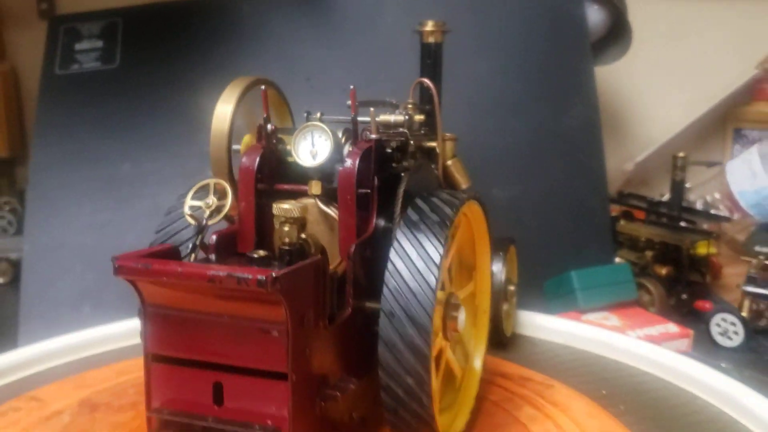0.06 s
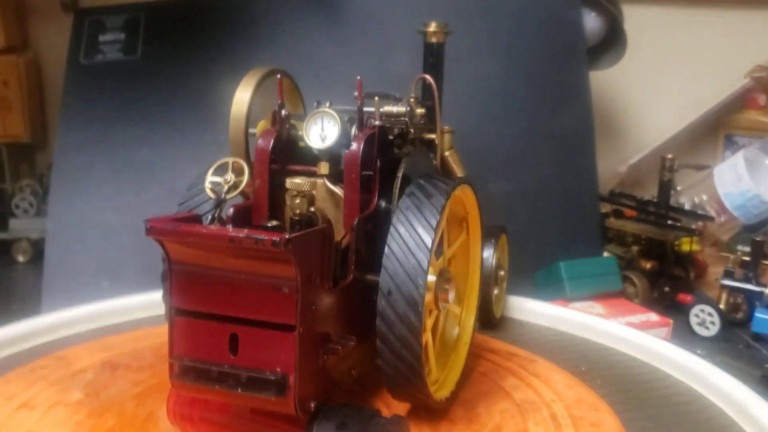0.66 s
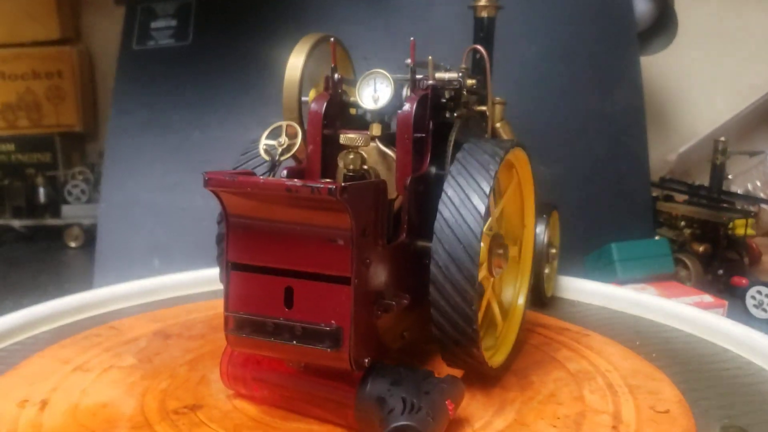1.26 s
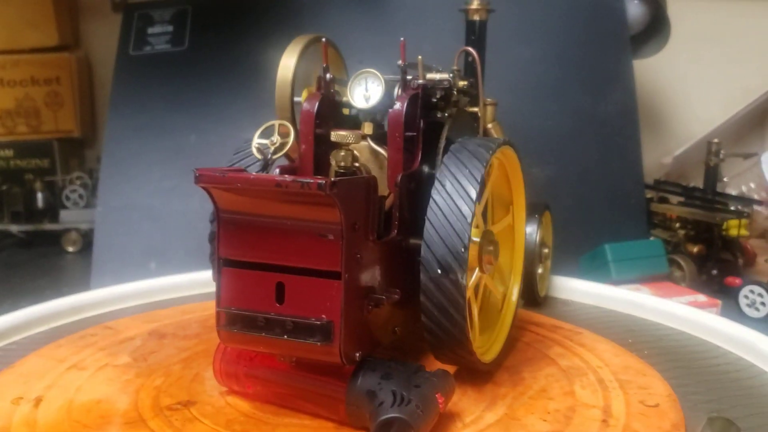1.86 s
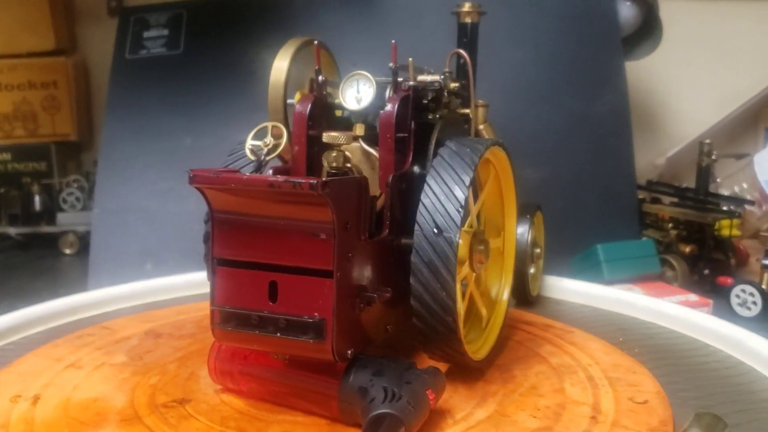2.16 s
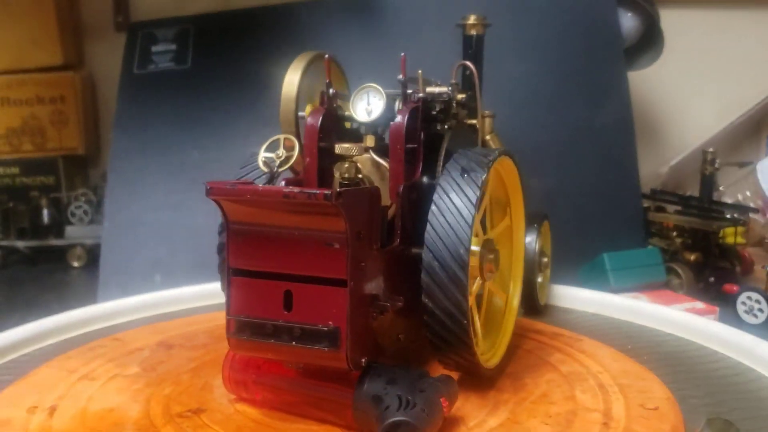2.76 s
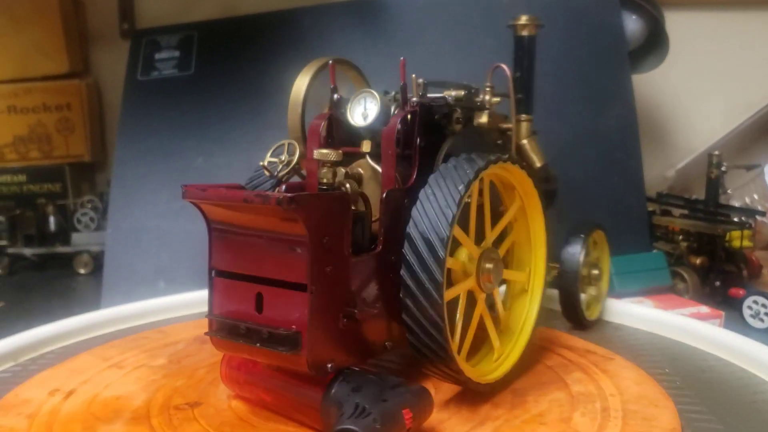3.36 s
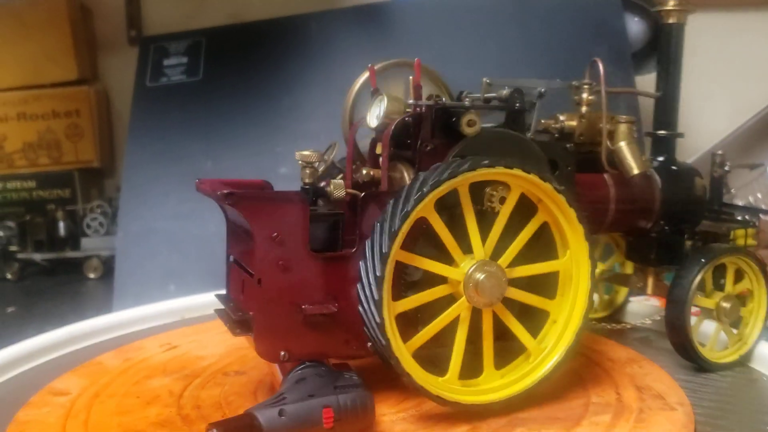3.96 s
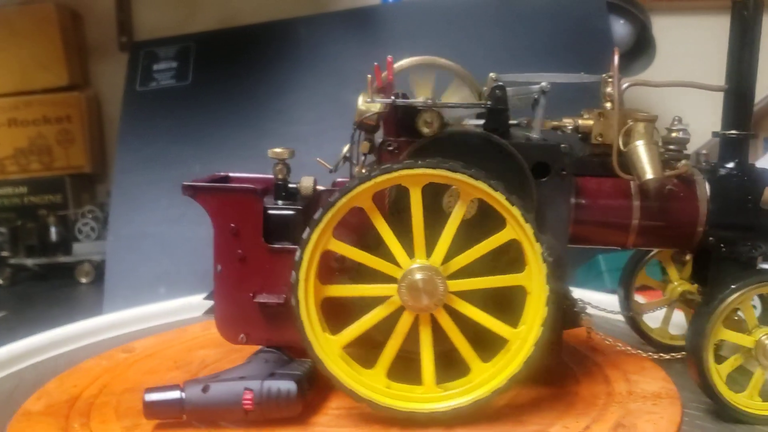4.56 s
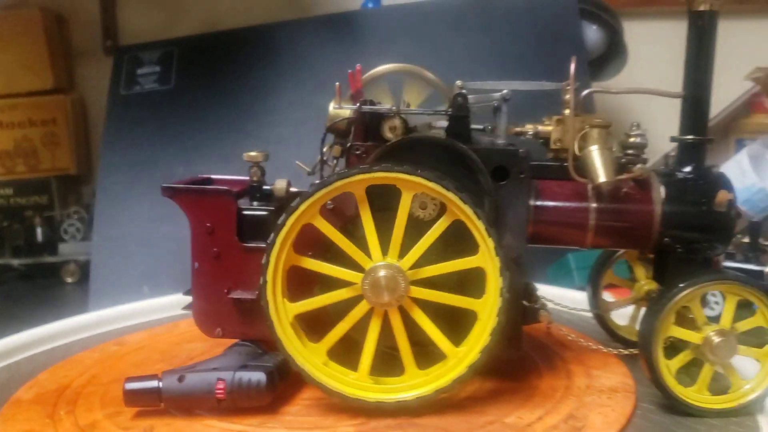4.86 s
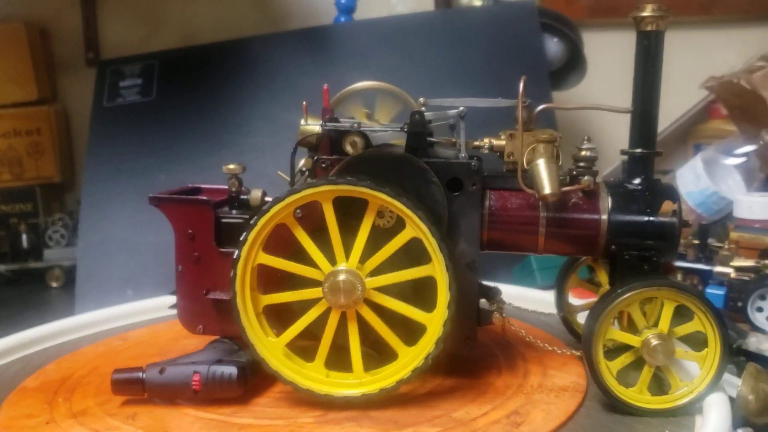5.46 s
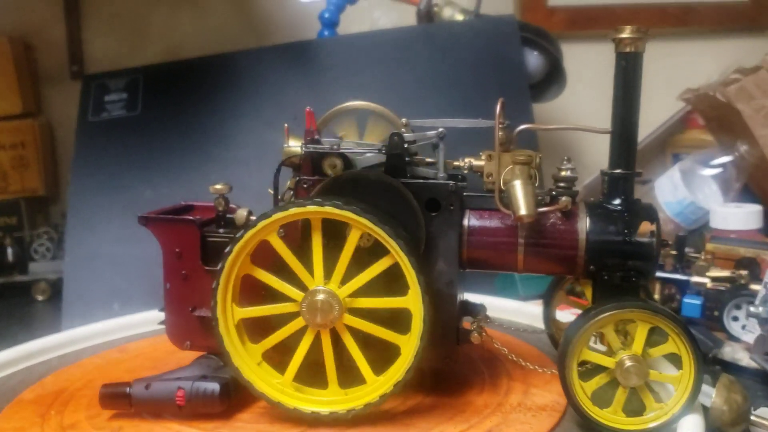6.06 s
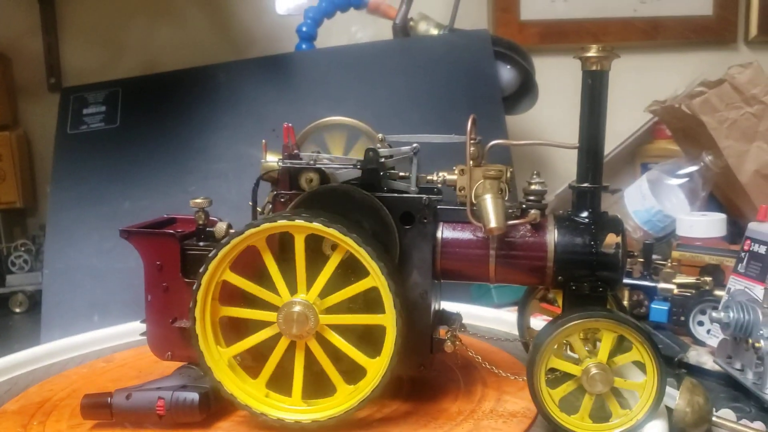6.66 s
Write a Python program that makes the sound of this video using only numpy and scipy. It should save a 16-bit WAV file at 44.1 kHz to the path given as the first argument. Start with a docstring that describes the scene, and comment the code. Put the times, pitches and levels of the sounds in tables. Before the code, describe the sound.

A small model steam engine runs quietly in a workshop, its rods tapping in a quick, even rhythm under a steady hiss, with faint chuffs and tiny spits of water. Early on, fingers rub, click sharply and thump right at the microphone. About halfway through, the turntable beneath the engine is pushed round with a grinding rumble, followed by light gear clanks and rattles as the engine keeps running.

```python
"""Model traction engine on a turntable

A model steam engine ticks over in a workshop, about six and a half turns a second. Rods and valve gear
knock in a fixed order on every turn; steam leaks steadily, chuffs twice a turn and spits drops of water.
Loose parts rattle, slack gears clank, and the table is pushed round on its rumbling bearing.
Close up, fingers rub, click and thump on a hand-held camera, and the palm cups one microphone."""
import sys
import numpy as np
from scipy import signal
from scipy.fft import rfft, irfft, next_fast_len
from scipy.io import wavfile

SR = 44100
rng = np.random.default_rng(int(sys.argv[2]) if len(sys.argv) > 2 else 0)


def transcribe(u):
    """Save the signal u as a 16-bit wav file named by the first command-line argument.

    u: samples, shape (n,) or (channels, n), limited to [-1, 1]; the rate is SR.
    q: integer samples, one column per channel.
    """
    v = np.clip(np.atleast_2d(u).T, -1, 1)
    q = np.round(v * 32767).astype(np.int16)
    wavfile.write(sys.argv[1], SR, q)


N = 296352
TIME = np.arange(N) / SR


def from_db(db):
    """Decibels to gain."""
    return 10 ** (np.asarray(db) / 20)


def rms_one(x):
    """Scale to rms 1."""
    return x / np.sqrt(np.mean(x ** 2) + 1e-20)


def in_time(rows):
    """Each column of an automation curve at every sample."""
    s, *columns = np.transpose(rows)
    return [np.interp(TIME, s, c) for c in columns]


def panned(pan_db):
    """Stereo gains for a pan, given throughout as left minus right in dB."""
    return from_db(np.array([[.5], [-.5]]) * pan_db)


def add(out, s, sound):
    """Mix a stereo sound in at s seconds."""
    start = int(np.clip(round(s * SR), 0, N - 1))
    out[:, start:start + sound.shape[1]] += sound[:, :N - start]


def drift(knots_per_s):
    """A random wander, gliding between values of spread 1."""
    knots = rng.standard_normal(1400)
    return np.interp(TIME * knots_per_s, np.arange(len(knots)), knots)


def stereo_noise(likeness, size=N):
    """White noise; likeness is the share of power common to left and right."""
    shared, own = rng.standard_normal(size), rng.standard_normal((2, size))
    return np.sqrt(likeness) * shared + np.sqrt(1 - likeness) * own


def coloured(x, spectrum):
    """Equalise with a curve that falls steeply beyond its ends; rms 1."""
    hz, db = np.transpose(spectrum)
    size = next_fast_len(N)
    log_hz = np.log(np.arange(size // 2 + 1) * SR / size + 1)
    outside = np.maximum(np.log(hz[0]) - log_hz, 0) + np.maximum(log_hz - np.log(hz[-1]), 0)
    gain = from_db(np.interp(log_hz, np.log(hz), db) - 45 * outside)
    return rms_one(irfft(rfft(x, size) * gain, size)[..., :N])


def decaying(kicks, decay_s):
    """Give every kick an exponential tail."""
    return signal.lfilter([1], [1, -np.exp(-1 / (decay_s * SR))], kicks + 1e-18)


def resonate(x, hz, width_hz):
    """One resonance with gain 1 at its peak."""
    r = np.exp(-np.pi * width_hz / SR)
    feedback = [1, -2 * r * np.cos(2 * np.pi * hz / SR), r * r]
    return signal.lfilter(np.array([1, 0, -1]) * (1 - r * r) / 2, feedback, x + 1e-18)


def body(force, modes):
    """Steep-skirted modes in parallel, alternating in polarity, each with its own pan; rms 1."""
    out = 0
    for k, (hz, width, db, pan) in enumerate(modes):
        mode = rms_one(resonate(resonate(force, hz, width), hz, 4 * width))
        out = out + (-1) ** k * from_db(db) * panned(pan) * mode
    return rms_one(out)


# The flywheel's tempo. Each row: time in seconds, turns per second.
FLYWHEEL_SPEED = [(0, 6.323), (1.9, 6.698), (2.7, 6.694), (3.6, 6.588), (4.3, 6.433), (5.0, 6.38),
                  (6.2, 6.441), (6.72, 6.35)]
START_TURNS = .057


def each_turn(positions, levels_db, decay_s, scatter_db, jitter_s):
    """An envelope that jumps at given crank positions on every turn and dies away."""
    turns = START_TURNS + np.cumsum(in_time(FLYWHEEL_SPEED)[0]) / SR
    due = np.arange(int(turns[-1]) + 1)[:, None] + np.array(positions)
    when = np.interp(due, turns, TIME, left=-1, right=-1) + jitter_s * rng.standard_normal(due.shape)
    height = from_db(np.array(levels_db) + scatter_db * rng.standard_normal(due.shape))
    heard = (when > 0) & (when < TIME[-1])
    kicks = np.bincount((when[heard] * SR).astype(int), height[heard], N)
    return decaying(kicks, decay_s)


# Where the hisses sit as the camera moves. Each row: time in seconds, leak pan in dB, boiler pan in dB.
HISS_PANS = [(0, 2, -6), (.5, 2.5, -6.5), (1.15, -8.5, 9.5), (1.9, -6, 18), (3.0, -7.5, 11),
             (3.7, -6, 10.5), (5.2, -7.5, 18), (6.72, -9, 12.5)]
# Exhaust openings. Each row: crank position in turns, puff height in dB against the steady leak.
EXHAUST_PUFFS = [(0.123, 1), (0.61, -3)]
# The leak's EQ on each side. Each row: frequency in Hz, gain in dB.
LEAK_EQ_LEFT = [(2500, -30), (3000, -17), (5000, -5), (6300, -6), (7500, -14), (8500, -15), (10300, -13),
                (11000, -8), (11700, -2.5), (13000, -1), (14200, -1.5), (15500, 3), (16000, -14)]
LEAK_EQ_RIGHT = [(2900, -25), (3150, -2), (3500, -32), (4000, -13), (4800, -10.5), (6100, -7), (7400, -7),
                 (8300, -19.5), (9700, -8.5), (11500, 1), (13000, 0.5), (14500, -4), (16000, -20)]
# The pitches of the low, middle and high whistle in Hz.
WHISTLE_HZ = [7600, 11345, 15608]
# Their voicing. Each row: bandwidth in Hz, level in dB against the leak, pan in dB.
WHISTLES = [(25, -21, 8), (25.2, -21, -22), (30, -19.5, -1)]
# Whistle flares. Each row: centre and half-width in seconds, low, middle and high whistle's lift in dB.
SQUEAKS = [(0.856, 0.025, 8, 7, 12), (0.95, 0.026, 0, 18, 24), (1.635, .015, 0, -2, 18),
           (2.21, .015, 2, 14, 4), (2.34, .012, 2, 16, 0), (4.162, 0.03, 9, 16, 19),
           (4.31, 0.021, 4, 7, 13), (5.21, .02, 8, 0, 11), (5.37, .02, 0, -3, 11), (5.52, .015, 0, 0, 10),
           (5.625, 0.04, 18, -3, 9), (5.948, 0.018, -7, 25, 24), (6.28, 0.017, 0, 14, 17)]


def steam_leak(swing_db, level_db=-56, follow=.63, drops_per_s=45):
    """A steady, faintly crackling leak with thin squeaking whistles; each exhaust opening adds a puff."""
    leak_pan, _ = in_time(HISS_PANS)
    position, puff_db = np.transpose(EXHAUST_PUFFS)
    flow = 1 + each_turn(position, puff_db, decay_s=.006, scatter_db=2.5, jitter_s=.0004)
    drops = (rng.random(N) < drops_per_s / SR) * from_db(14 - 18 * rng.random(N))
    crackle = decaying(drops, decay_s=.0003)
    jet = (flow + crackle) * stereo_noise(likeness=.013)
    hiss = panned(leak_pan) * np.array([coloured(jet[0], LEAK_EQ_LEFT), coloured(jet[1], LEAK_EQ_RIGHT)])
    flares_db = sum(np.outer(lifts_db, np.exp(-((TIME - s) / half_width) ** 2))
                    for s, half_width, *lifts_db in SQUEAKS)
    whistles = 0
    for hz, (width, db, pan), flare_db in zip(WHISTLE_HZ, WHISTLES, flares_db):
        whistle = rms_one(resonate(stereo_noise(likeness=.21), hz, width))
        whistles = whistles + from_db(db + flare_db) * panned(pan) * whistle
    return from_db(level_db + follow * swing_db) * (hiss + whistles)


# The boiler's EQ. Each row: frequency in Hz, gain in dB.
BOILER_EQ = [(300, -18), (420, -31), (720, -8.5), (1200, 2.5), (1750, 5.5), (2100, -1.5), (2400, -11),
             (2750, -5), (3150, 3), (4000, 0.5), (4900, -4.5), (6300, -6.5), (7300, -5.5), (8700, -6.5)]


def boiler(swing_db, level_db=-64):
    """The boiler simmers with a softer, lower, wavering hiss."""
    _, pan = in_time(HISS_PANS)
    waver_db = 1.5 * drift(knots_per_s=25)
    simmer = coloured(stereo_noise(likeness=.098), BOILER_EQ)
    return from_db(level_db + swing_db + waver_db) * panned(pan) * simmer


# The room tone's EQ. Each row: frequency in Hz, gain in dB.
AIR_EQ = [(30, 0), (75, 4), (120, -4.5), (180, -1), (300, -9.5), (450, -10.5), (760, -16.5), (1100, -55)]


def room_tone(level_db=-73.5):
    """The workshop's air lays a faint, low bed under everything."""
    return from_db(level_db) * coloured(stereo_noise(likeness=.6), AIR_EQ)


# Finger slides. Each row: start and length in seconds, hiss level in dB, rumble level in dB, pan in dB.
FINGER_RUBS = [(-.03, 0.13, -48, -93, 17), (0.09, 0.099, -52.5, -71.5, 10), (0.683, 0.085, -44, -46, -6),
               (0.743, 0.058, -45.5, -54, 9), (0.933, 0.017, -49, -83, 7), (1.334, 0.11, -78, -70, -23),
               (1.549, 0.18, -67, -63.5, -11), (2.516, 0.069, -57.5, -53, -12.5),
               (2.929, 0.15, -79, -58, 5), (5.667, 0.207, -82, -74, -27), (5.815, 0.015, -46, -45.5, -14.5),
               (5.955, 0.045, -50.5, -61, -9.5), (6.019, 0.063, -56.5, -58, -22),
               (6.077, 0.15, -71, -75, -12)]
# The EQ of the rub's two layers. Each row: frequency in Hz, gain in dB.
RUB_HISS_EQ = [(700, -6), (1500, 2), (3500, 5), (4800, 3.5), (6800, 8.5), (9000, -0.5), (12000, 7.5),
               (16000, -3.5)]
RUB_RUMBLE_EQ = [(25, 1), (55, 4), (100, 0), (200, -6), (400, -15.5), (900, -23.5)]


def finger_rubs(fade_s=.0085):
    """Skin sliding near the microphones gives a grainy hiss over a low rumble."""
    grainy = stereo_noise(likeness=.074) * from_db(2 * drift(knots_per_s=180))
    hiss = coloured(grainy, RUB_HISS_EQ)
    rumble = coloured(stereo_noise(likeness=.66), RUB_RUMBLE_EQ)
    out = np.zeros((2, N))
    for s, length, hiss_db, rumble_db, pan in FINGER_RUBS:
        span = slice(*np.searchsorted(TIME, [s, s + length]))
        from_edge_s = np.minimum(TIME[span] - s, s + length - TIME[span])
        touch = np.clip(from_edge_s / min(fade_s, length / 4), 0, 1)
        rub = from_db(hiss_db) * hiss[:, span] + from_db(rumble_db) * rumble[:, span]
        out[:, span] += touch * panned(pan) * rub
    return out


# Dips in the tone of the knocks and chuffs. Each row: centre in Hz, width in Hz.
TONE_DIPS = [(680, 250), (2450, 340)]


def hollowed(x):
    """Two dips, near 680 and 2450 Hz, make the knocks and chuffs sound hollow."""
    for hz, width in TONE_DIPS:
        x = x - resonate(x, hz, width)
    return x


# The rhythm of the joints: the crank position of each contact in turns.
CONTACT_TURNS = [.015, .13, .19, .335, .43, .50, .61, .66, .725, .765, .82, .875, .925]
# Their accents. Each row: frame blow, bright tick and part's ring in relative dB, ring pitch in Hz.
JOINT_CONTACTS = [(-9, -6, -1.5, 1200), (-4, -3, -15, 1700), (2.5, -8, 4, 1500), (-0.5, -3, 7.5, 1540),
                  (-4, -42, -5.5, 2000), (-18, -25, -1.5, 1700), (-2.5, -28, 0, 1600), (-7, -3, 4.5, 1780),
                  (-5.5, -13, -7, 1100), (-13, -5, -1.5, 1800), (3.5, 0, 5.5, 1520), (-5.5, -22, 0, 1350),
                  (-7.5, -8, 7, 1820)]
# Frame modes from behind and side-on. Each row: pitch and bandwidth in Hz, relative level and pan in dB.
FRAME_REAR = [(406, 100, -2, 2), (949, 71, 5.5, 14), (1230, 47, 2.5, 8), (1600, 137, -3, 29),
              (1660, 100, 0, 39), (1810, 340, -4.5, 22), (3020, 24, -2, -19), (3350, 67, -14, 39),
              (3870, 40, -9, 37)]
FRAME_SIDE = [(560, 130, -1.5, 2.6), (980, 46, -2, 14), (1150, 64, 6.5, 1.8), (1531, 32, 4.5, 12.6),
              (1700, 710, -15, 18), (1730, 260, -2, 33), (3128, 45, 4, 17), (3470, 43, -6.5, 32.5),
              (4150, 55, -4, 12)]
# The crossfade as the engine swings round. Each row: time in seconds, side-on share from 0 to 1.
SIDE_ON = [(3.2, 0.02), (4.7, 1)]


def rods_and_valve_gear(swing_db, frame_db=-62.3, parts_db=-68.3, ticks_db=-65.5, follow=.52):
    """Slack joints tap in turn, ringing their own parts and the frame, with sliding friction between."""
    blow_db, bright_db, ring_db, ring_hz = np.transpose(JOINT_CONTACTS)
    side_on, = in_time(SIDE_ON)
    hard_tap = dict(decay_s=.00002, scatter_db=2, jitter_s=.0004)
    taps = each_turn(CONTACT_TURNS, blow_db, **hard_tap)
    chatter, friction = .61 * decaying(taps, decay_s=.004), .035
    force = 14 * taps + (chatter + friction) * stereo_noise(likeness=.4)
    frame = np.sqrt(1 - side_on) * body(force, FRAME_REAR) + np.sqrt(side_on) * body(force, FRAME_SIDE)
    parts = 0
    for position, db, hz in zip(CONTACT_TURNS, ring_db, ring_hz):
        tap = each_turn([position], [db], **hard_tap)
        parts = parts + resonate(resonate(tap, hz, width_hz=50), hz, width_hz=280)
    knocks = from_db(frame_db) * frame + from_db(parts_db) * panned(20) * rms_one(parts)
    snaps = each_turn(CONTACT_TURNS, bright_db, decay_s=.003, scatter_db=1.5, jitter_s=.0005)
    tick_eq = [(700, -8), (1800, 9.5), (2500, -8), (3100, -5), (3900, 7.5),  # Hz, dB
               (4800, -3), (6300, 5), (8500, -15), (14000, -3)]
    ticks = coloured(snaps * stereo_noise(likeness=.02), tick_eq)
    return hollowed(from_db(follow * swing_db) * knocks) + from_db(ticks_db) * panned(3.4) * ticks


# The piston's two strokes. Each row: crank position in turns, chuff and rasp accents in relative dB.
PISTON_STROKES = [(.335, 3, -8), (.82, 3, 0)]
# The EQ of the hollow chuff and the sharp rasp. Each row: frequency in Hz, gain in dB.
CHUFF_EQ = [(330, -6), (430, -3), (540, -2.5), (720, -6), (1100, -3), (1800, -2), (2300, -21)]
RASP_EQ = [(2600, -34), (3100, -3), (3500, -2.5), (3950, -0.5), (4600, -9.5), (6300, -11), (7500, -13.5)]


def chuffs(swing_db, chuff_db=-69, rasp_db=-66.5, follow=.28):
    """Each stroke sends a hollow chuff up the chimney; every second one has a sharper rasp."""
    position, chuff_accents, rasp_accents = np.transpose(PISTON_STROKES)
    hollow = each_turn(position, chuff_accents, decay_s=.022, scatter_db=3.5, jitter_s=.00072)
    sharp = each_turn(position, rasp_accents, decay_s=.024, scatter_db=2, jitter_s=.00043)
    chuff = from_db(chuff_db) * panned(5.3) * coloured(hollow * stereo_noise(likeness=.77), CHUFF_EQ)
    rasp = from_db(rasp_db) * panned(5.7) * coloured(sharp * stereo_noise(likeness=.067), RASP_EQ)
    return from_db(follow * swing_db) * (chuff + rasp)


# Loose parts. Each row: start in seconds, peak in dB before panning, pitch in Hz, decay in seconds.
RATTLES = [(0.129, -51, 1870, 0.031), (.165, -57, 437, 0.024), (1.189, -44.5, 1630, 0.005),
           (2.19, -54.5, 453, 0.052), (2.196, -46.5, 1760, 0.0082), (2.224, -47.5, 2124, 0.0092),
           (2.24, -47, 1890, 0.017), (2.224, -48.5, 5650, 0.012), (2.368, -50, 476, 0.022),
           (2.485, -53.5, 427, 0.021), (2.596, -45.5, 458, 0.032), (2.609, -48.5, 1770, 0.014),
           (3.589, -31.5, 1880, 0.0033), (3.645, -32, 1830, 0.0045), (3.728, -40.5, 1840, 0.0039),
           (3.881, -42, 1830, 0.016), (5.229, -55, 280, 0.023), (5.249, -41.5, 1770, 0.0041),
           (5.395, -46, 1760, 0.0018), (5.55, -47.5, 1750, 0.0027), (6.344, -45.5, 1810, 0.037),
           (6.35, -59, 475, 0.013), (6.456, -46, 1720, 0.015), (6.456, -52.5, 560, 0.0064),
           (6.653, -56, 540, 0.0082)]


def rattles():
    """A loose part buzzes for a moment in one resonance."""
    out, t = np.zeros((2, N)), TIME[:SR // 6]
    for s, db, hz, decay in RATTLES:
        buzz = stereo_noise(likeness=1, size=len(t)) * np.exp(-t / decay)
        ring = resonate(resonate(buzz, hz, width_hz=175), hz, width_hz=180)
        add(out, s, from_db(db) * panned(8.8) * ring / np.abs(ring).max())
    return out


# Fingers clicking on the camera. Each row: start in seconds, peak in dB before panning, centre and
# bandwidth in Hz, broad crack in relative dB, contact decay in seconds, pan in dB.
CASING_CLICKS = [(.2140, -41.5, 5000, 4000, 4, .0005, 20),
                 (0.3069, -24.5, 1800, 1000, -19.5, 0.00026, 17.5),
                 (0.6943, -25, 5600, 4000, -2, .0011, 15), (.6945, -31, 13000, 5000, -20, .0012, 0),
                 (0.6967, -20.5, 5600, 4000, -1, .0009, 9), (.6968, -25, 12500, 5000, -20, .0008, 0),
                 (0.709, -27, 1000, 620, -37, .001, 12.5), (0.7092, -26, 3570, 3200, -10, 0.0016, 5),
                 (.721, -26.5, 2750, 2190, -2, 0.0008, 20), (.7218, -31, 1500, 500, -20, .001, 12),
                 (.7529, -24, 10500, 6000, -20, .001, 6), (0.7532, -25.5, 980, 403, -22, 0.00059, 11),
                 (0.7533, -17.5, 2950, 1900, -14, .0007, 21), (1.0886, -31.5, 5800, 3200, -30, .0003, 25),
                 (1.229, -30.5, 10500, 5000, -7, .0012, -8), (2.526, -24.5, 4770, 4970, 10, 0.00075, 13.5),
                 (2.5263, -39.5, 1000, 700, -7, .0005, 19), (2.54, -40, 6000, 3500, -15, .0005, 2),
                 (5.8215, -28.5, 12600, 4000, -30, 0.0056, -18)]


def casing_clicks(smear=.627):
    """A dry snap of the casing, over in a few milliseconds; its lows arrive last."""
    out, t = np.zeros((2, N)), TIME[:SR // 40]
    for s, db, hz, width, crack_db, contact_s, pan in CASING_CLICKS:
        scuff = .2 * np.exp(-t / contact_s) + .003 * np.exp(-t / .006)
        force = (t == 0) + scuff * stereo_noise(likeness=.5, size=len(t))
        crack = from_db(crack_db) * resonate(force, hz=3200, width_hz=3900)
        snap = resonate(resonate(force, hz, width), hz, 2 * width) + crack
        for _ in range(6):  # all-pass stages delay the lows
            snap = signal.lfilter([-smear, 1], [1, -smear], snap)
        add(out, s, from_db(db) * panned(pan) * snap / np.abs(snap).max())
    return out


# Drops spat out with the steam. Each row: start in seconds, mono peak in dB before panning.
WATER_SPITS = [(.437, -51), (.592, -42.5), (1.399, -45), (1.5537, -42), (1.7045, -39), (1.8057, -42),
               (1.8533, -43), (2.0032, -49), (2.1529, -52), (2.3026, -43), (2.4517, -40), (2.6016, -38),
               (2.751, -38), (2.9008, -34.5), (3.051, -51), (3.2005, -48), (3.503, -46), (3.8078, -38.5),
               (3.878, -40), (3.9608, -40), (4.115, -51), (4.1464, -40), (4.2706, -42), (4.425, -49),
               (5.204, -43), (5.361, -53), (5.5916, -41), (5.6759, -42), (6.1402, -45), (6.2723, -36.5),
               (6.296, -45), (6.452, -46), (6.6047, -44)]


def water_spits(burst_s=.0013, spray_s=.014, spray_db=-17, low_db=-9):
    """A drop bursts with a sharp, bright tick and trails a grainy spray."""
    out, t = np.zeros((2, N)), TIME[:SR // 16]
    low_cut = signal.butter(2, 3800, "high", fs=SR, output="sos")
    for s, db in WATER_SPITS:
        grains = np.interp(t, t[::30], rng.exponential(1, len(t[::30])))
        envelope = np.exp(-t / burst_s) + from_db(spray_db) * grains * np.exp(-t / spray_s)
        burst = signal.sosfilt(low_cut, envelope * stereo_noise(likeness=.23, size=len(t)))
        high = resonate(resonate(burst, 14900, 4700), 12000, 7000)
        low = resonate(resonate(burst, 5500, 3200), 5300, 4000)
        tick = high + from_db(low_db) * low
        add(out, s, from_db(db) * panned(-5.5) * tick / np.abs(tick.mean(axis=0)).max())
    return out


# Handling thumps. Each row: start in seconds, peak in dB before panning, pitch in Hz,
# decay in seconds, pan in dB.
HAND_THUMPS = [(0.697, -31, 90, 0.0043, 4), (0.7122, -19, 88, 0.0058, -15),
               (0.754, -29, 67.3, 0.0033, -22.5), (1.359, -55.5, 65, 0.029, -23),
               (1.595, -58, 86, 0.022, -21), (1.668, -45, 62, 0.0039, -24), (2.258, -53.5, 87, 0.002, -29),
               (2.526, -49.5, 66.3, 0.02, -23), (2.973, -44, 80.5, 0.021, 2),
               (5.687, -56.5, 59, 0.025, -36), (5.793, -47.5, 61, 0.0051, -22),
               (6.047, -65, 77, 0.036, -28), (6.58, -64, 61.7, 0.019, -26)]


def hand_thumps(rise_s=.00015):
    """A push on the casing swings the microphones for a few slow cycles."""
    out, t = np.zeros((2, N)), TIME[:SR // 4]
    for s, db, hz, decay, pan in HAND_THUMPS:
        swing = np.sin(2 * np.pi * hz * t) * np.exp(-t / decay) * (1 - np.exp(-t / rise_s))
        add(out, s, from_db(db) * panned(pan) * swing / np.abs(swing).max())
    return out


def swells(rows, rise_s, coast_s):
    """Each event rises, holds for its length and dies away; one envelope for each level column."""
    envelopes = 0
    for s, length, *levels_db in rows:
        attack = np.clip((TIME - s) / rise_s, 0, 1)
        release = np.exp(-np.maximum(TIME - s - length, 0) / coast_s)
        envelopes = envelopes + from_db(levels_db)[:, None] * attack * release
    return envelopes


# Pushes on the table, and jolts where its bearing catches.
# Each row: start and length in seconds, rim ring and deck boom in dB before the trim.
TABLE_PUSHES = [(.8, 0.42, -59.5, -67), (3.25, 0.89, -58, -68.5), (3.62, 0.37, -59.5, -62),
                (3.98, 0.12, -60, -63.5), (4.16, 0.52, -53.5, -65.5)]
BEARING_JOLTS = [(3.435, 0.056, -46, -64), (3.51, 0.025, -46, -60.5), (3.578, 0.06, -49, -64),
                 (3.647, 0.058, -44.5, -54), (3.72, 0.03, -59, -53.5), (3.79, 0.021, -43.5, -57),
                 (3.918, 0.044, -45, -67), (3.975, 0.01, -48, -61), (4.062, 0.0094, -60, -61),
                 (4.124, 0.014, -48, -63), (4.21, 0.0072, -47, -81), (4.26, 0.014, -40, -87),
                 (4.33, 0.014, -42, -68), (4.375, 0.0075, -57, -57), (4.412, 0.0097, -52, -80),
                 (4.462, 0.013, -45, -58), (4.492, 0.012, -49, -63), (4.55, 0.016, -56, -65),
                 (4.61, 0.013, -49, -69), (4.66, 0.038, -54, -88), (4.75, 0.027, -58, -70)]
# The table's rim and deck modes. Each row: pitch and bandwidth in Hz, relative level and pan in dB.
RIM_MODES = [(926, 128, 2, 11.5), (1040, 63, 5.5, 2), (1142, 54, 6.5, 9), (1364, 140, -0.5, 13),
             (1720, 330, -2.5, 16), (3350, 720, -9.5, 20)]
DECK_MODES = [(206, 225, -9.5, 1.1), (414, 127, 2, 3), (550, 630, -1, 1)]


def turntable(bumps_per_s=3000, trim_db=-1.5):
    """Balls of the bearing bump along their race; the rim rings and, under load, the deck booms."""
    pushes = swells(TABLE_PUSHES, rise_s=.0056, coast_s=.03)
    jolts = swells(BEARING_JOLTS, rise_s=.007, coast_s=.007)
    ring, boom = pushes + jolts
    bumps = rng.random(N) < bumps_per_s / SR
    grind = decaying(bumps, decay_s=.00088) * stereo_noise(likeness=.89)
    grind *= from_db(2.2 * drift(knots_per_s=55))
    return from_db(trim_db) * (ring * body(grind, RIM_MODES) + boom * body(grind, DECK_MODES))


# Harder knocks of the gearing. Each row: start in seconds, attack level in dB before panning.
GEAR_CLANKS = [(1.192, -54), (2.226, -52), (3.271, -70), (3.88, -47), (4.148, -41.5), (4.457, -40.5),
               (4.52, -43), (4.682, -45), (4.774, -54), (4.94, -47), (5.177, -56), (5.253, -45),
               (5.34, -47.5), (5.396, -49.5), (5.436, -51), (5.447, -50.5), (5.473, -64), (5.552, -53),
               (5.592, -47.5), (5.608, -57), (5.947, -48.5)]
# The clank's EQ. Each row: frequency in Hz, gain in dB.
CLANK_EQ = [(300, -11), (700, -7.5), (1200, 7), (1750, 8.5), (2500, -9), (3300, 6.5), (4200, -9),
            (7000, -6.5)]


def gear_clanks(decay_s=.0085):
    """Gear teeth take up their slack with a short, broad clank."""
    strikes = sum(from_db(db) * np.exp(-np.abs(TIME - s) / decay_s) * (TIME >= s)
                  for s, db in GEAR_CLANKS)
    return strikes * panned(9.2) * coloured(stereo_noise(likeness=.14), CLANK_EQ)


def workshop(x, t60_s=.22, wet_db=-14, predelay_s=.004):
    """A cluttered room adds a short diffuse tail."""
    t = TIME[:SR // 3]
    tail = rng.standard_normal((2, len(t))) * from_db(-60 * t / t60_s) * (t > predelay_s)
    tail /= np.sqrt(np.sum(tail ** 2, axis=1, keepdims=True))
    return x + from_db(wet_db) * signal.fftconvolve(x, tail, axes=1)[:, :N]


# The hand's grip. Each row: time in seconds, cupped share from 0 to 1, left treble cut in dB
# (a negative cut brightens).
HAND_CUPPING = [(0, 0.3, -4), (.2, 1, 9), (.66, 0.9, 13), (.8, 0, 1), (5.7, 0, -0.5), (5.92, 0.2, -2.5),
                (6.15, 1, -3.5), (6.72, 0.75, -6)]
# Resonances of the hollow palm. Each row: frequency in Hz, gain in dB.
PALM_EQ = [(600, 5), (1150, -5), (1800, 1.5), (3100, 0), (4200, 0.5), (5100, 2), (6200, 6.5), (7700, -7),
           (8900, 2), (9800, 5.5), (11000, -8.5), (12600, 7), (13600, 0.5), (15000, 6.5)]


def cupped(x, shade_hz=7000):
    """The hollow of the palm colours the right side; a finger shades the left."""
    left, right = x
    share, shade_db = in_time(HAND_CUPPING)
    hz, db = np.transpose(PALM_EQ)
    size = next_fast_len(N)
    log_hz = np.log(np.arange(size // 2 + 1) * SR / size + 1)
    palm_gain = from_db(np.interp(log_hz, np.log(hz), db))
    in_palm = irfft(rfft(right, size) * palm_gain, size)[:N]
    dull = signal.sosfilt(signal.butter(1, shade_hz, fs=SR, output="sos"), left)
    return np.array([dull + from_db(-shade_db) * (left - dull), (1 - share) * right + share * in_palm])


# The fader ride of the escaping steam. Each row: time in seconds, relative level in dB.
STEAM_RIDE = [(0.0, -52), (0.41, -53.5), (0.67, -54.5), (0.92, -52.5), (1.61, -61), (2.08, -61.5),
              (3.84, -51), (5.6, -55.5), (6.05, -55.5), (6.72, -60)]


def scene():
    """Engine and table in the room, the hand right at the microphones."""
    steam_db, = in_time(STEAM_RIDE)
    swing_db = steam_db - steam_db.mean()  # the boiler follows fully; leak, knocks and chuffs in part
    engine = rods_and_valve_gear(swing_db) + hollowed(chuffs(swing_db))
    machine = workshop(engine + turntable() + rattles() + gear_clanks())
    air = room_tone()
    steam = steam_leak(swing_db) + water_spits() + boiler(swing_db)
    return cupped(machine + steam + finger_rubs()) + air + casing_clicks() + hand_thumps()


def record(dry, low_cut_hz=38, high_cut_hz=16000):
    """The deepest bass rolls off and the top is cut steeply."""
    thinned = signal.sosfilt(signal.butter(2, low_cut_hz, "high", fs=SR, output="sos"), dry)
    return signal.sosfilt(signal.ellip(12, .1, 70, high_cut_hz, fs=SR, output="sos"), thinned)


dry = scene()
out = record(dry)
transcribe(out)
```